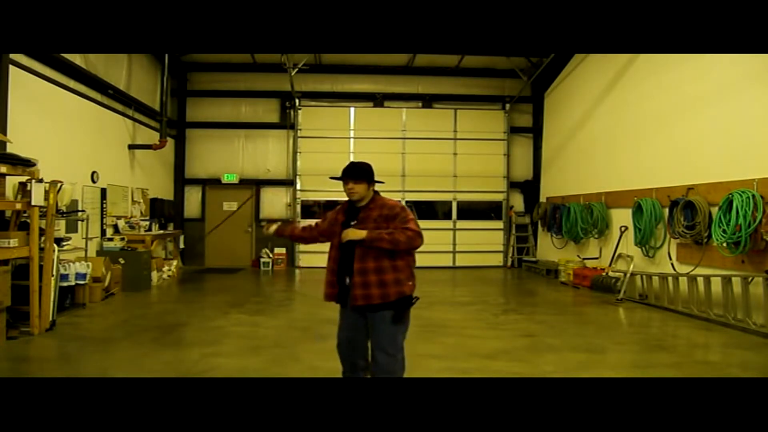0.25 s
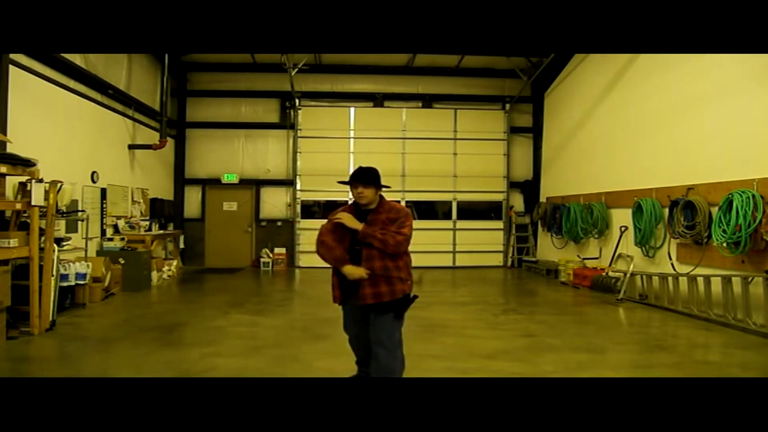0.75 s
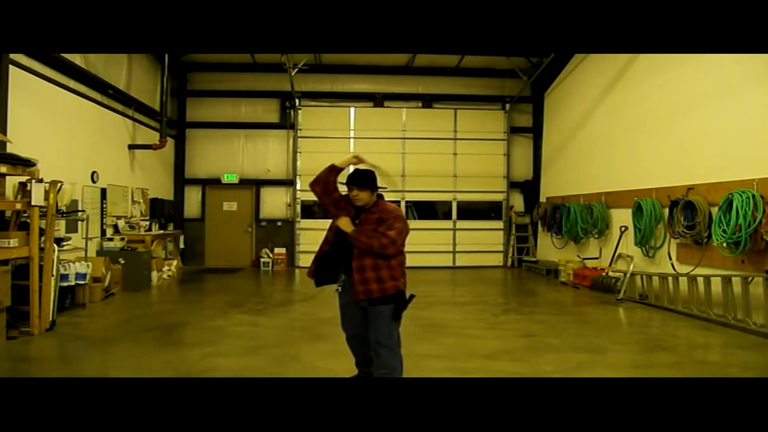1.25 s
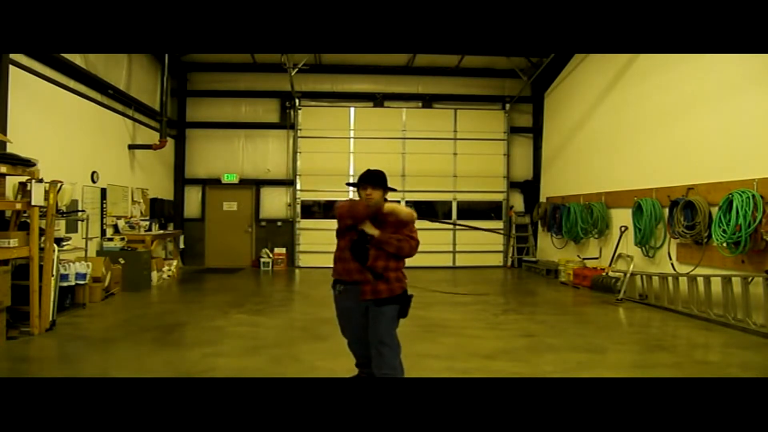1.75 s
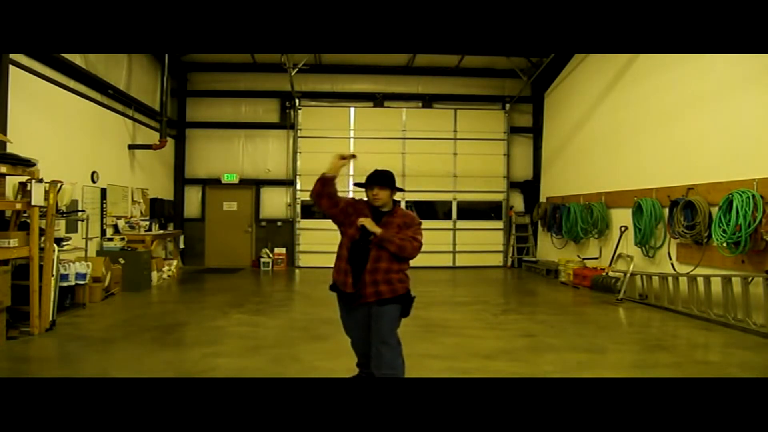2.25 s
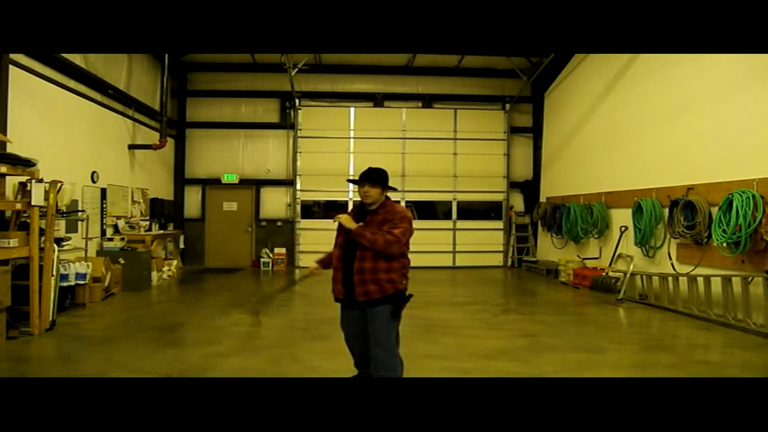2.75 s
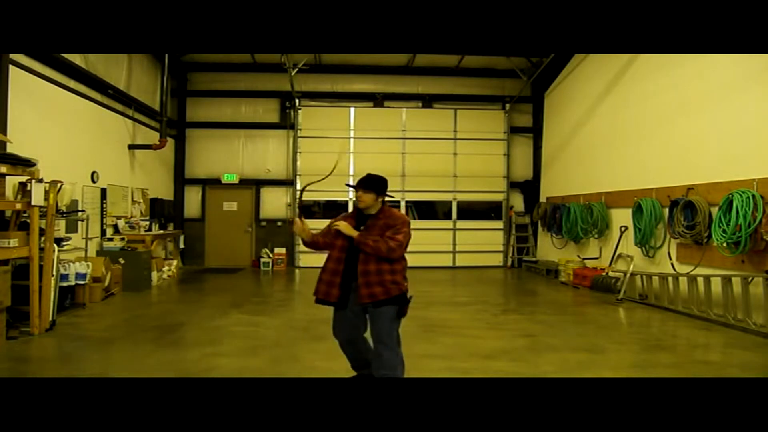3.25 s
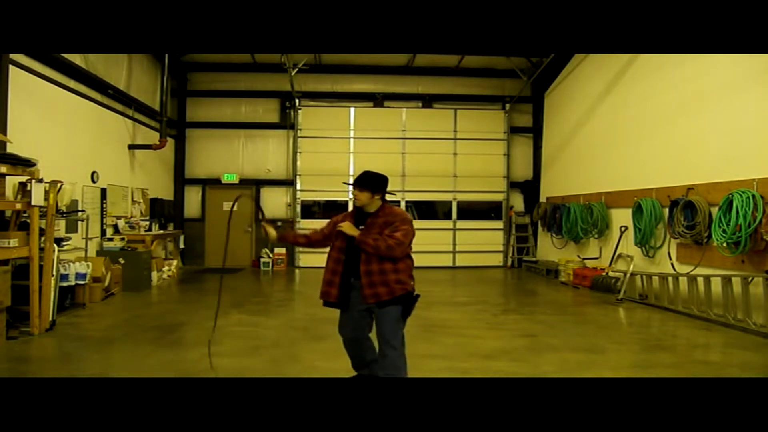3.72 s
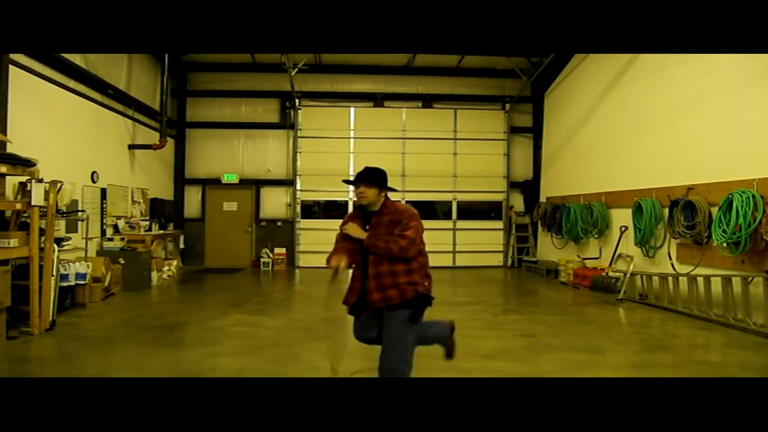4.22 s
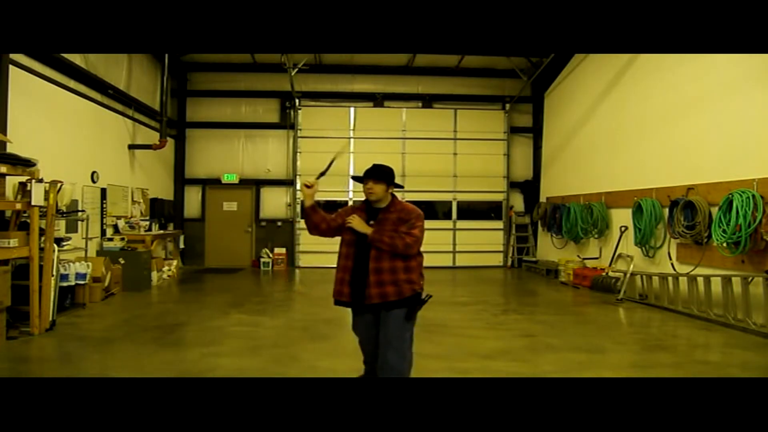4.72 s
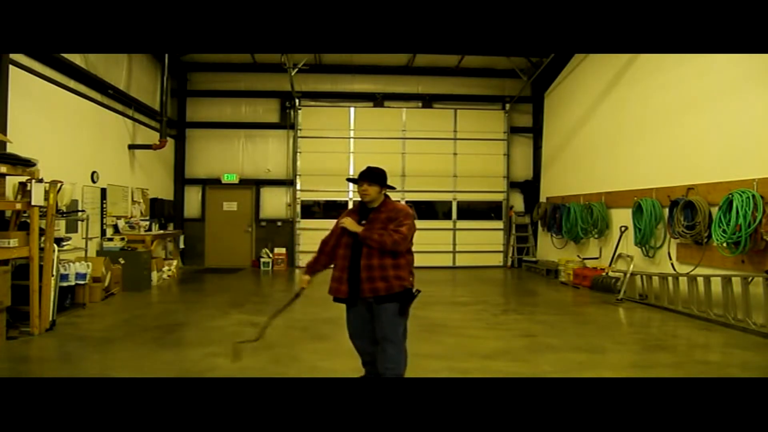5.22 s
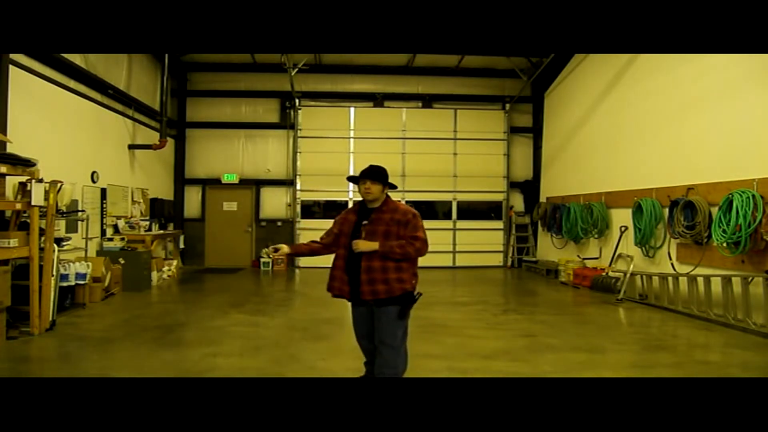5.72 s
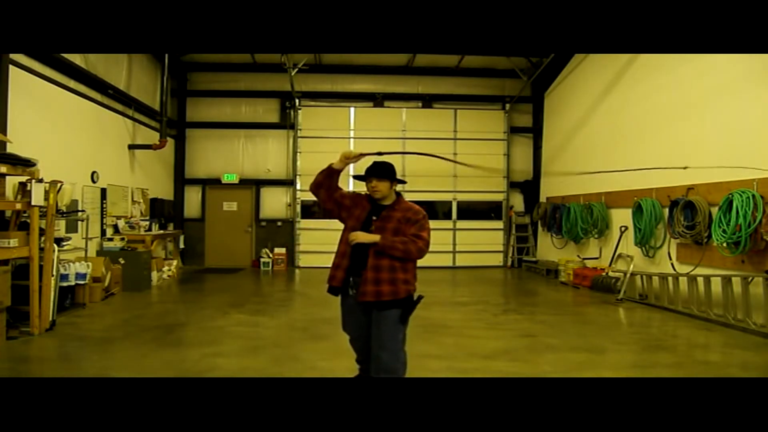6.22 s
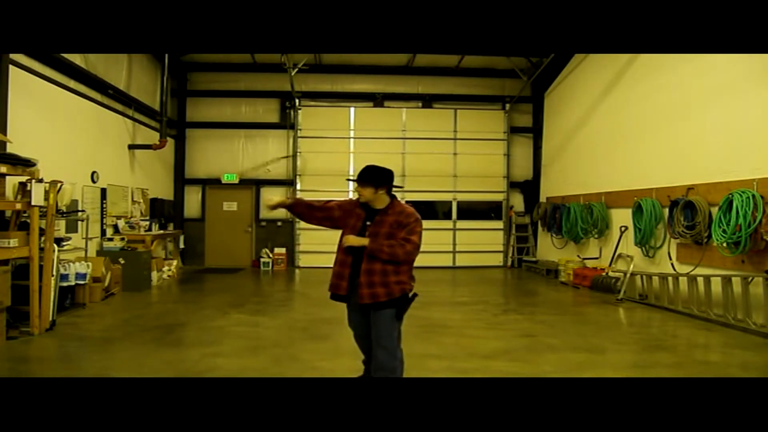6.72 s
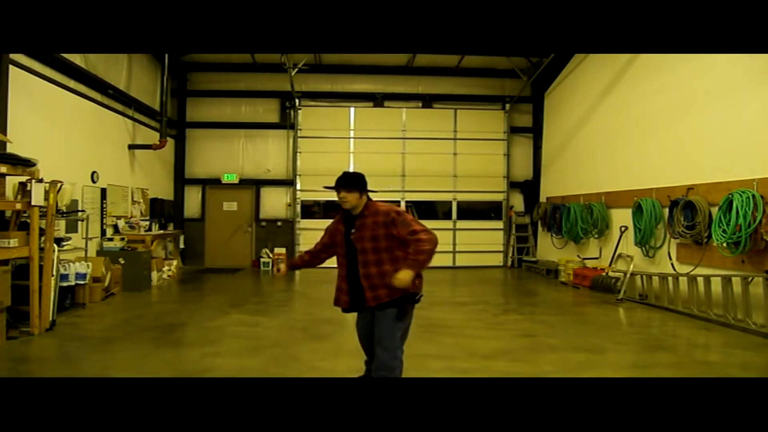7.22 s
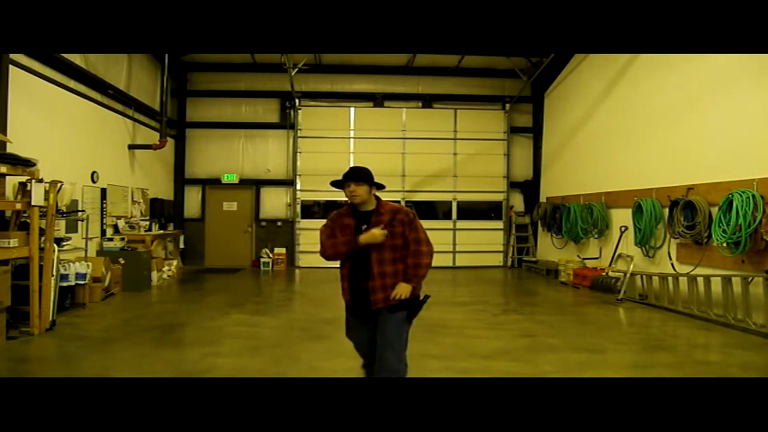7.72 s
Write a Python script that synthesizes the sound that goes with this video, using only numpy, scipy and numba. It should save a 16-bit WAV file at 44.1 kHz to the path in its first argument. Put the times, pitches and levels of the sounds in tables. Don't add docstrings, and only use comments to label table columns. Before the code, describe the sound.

In a big bare hall with a quiet hum, the tail of an earlier whip crack dies away. At 0.2 s a sharp crack bursts out with a dense echo, then a bright snap at 0.57 and a hard flick at 0.9. Soft swishes and small pitched flicks follow, with a faint crack at 1.8 and a flick at 2.0. A rising whistle leads to the hardest crack at 2.75, a dull one at 3.2, then a very hard, bright crack at 3.7 and strong ones at 4.13 and 4.55. A two-swell swish precedes the long-ringing crack at 5.36. A double flick snaps at 6.23; a falling whoosh leads to a crack and harder rebound at 7.05. A lone snap at 7.47 and a lower last crack at 7.87 with a bright rebound finish. Peaks clip; the microphone's gain ducks, then sustains the half-second echoes.

```python
import sys
import numpy as np
from scipy import signal
from scipy.fft import rfft, irfft
from scipy.io import wavfile
from numba import njit

SR = 44100
rng = np.random.default_rng(int(sys.argv[2]) if len(sys.argv) > 2 else 0)


def transcribe(u):
    v = np.clip(np.atleast_2d(u).T, -1, 1)
    q = np.round(v * 32767).astype(np.int16)
    wavfile.write(sys.argv[1], SR, q)


def gain_from_decibels(decibels):
    exponent = np.asarray(decibels, float) / 20
    return 10 ** exponent


N = 351191

SHARPNESS, THIN_SHARPNESS = 5.5, 4.5
CRACK_LIFT_DB = 6.5


def evened(x):
    return x / np.sqrt(np.mean(abs(x) ** 2) + 1e-20)


def read(points, hz):
    f, value = np.transpose(points)
    return np.interp(np.log(hz + 1), np.log(f + 1), value)


def add(mix, start_s, sound):
    part = mix[round(start_s * SR):][:len(sound)]
    part += sound[:len(part)]


def coloured_noise(size, points):
    spectrum = rfft(rng.standard_normal(size))
    gain_db = read(points, np.fft.rfftfreq(size, 1 / SR))
    return evened(irfft(spectrum * gain_from_decibels(gain_db), size))


def hum():
    # f/Hz, level/dB
    hum_spectrum = [(15, -70), (25, -66), (86, -30), (119, -38), (210, -5), (360, -3), (400, -1), (446, -6),
                    (539, -3.5), (829, -2.5), (1270, -8.5), (4280, -14.5), (15600, -20.5)]
    return gain_from_decibels(-46.5) * coloured_noise(N, hum_spectrum)


def hall():
    # f/Hz, t60/s
    hall_t60 = [(250, 0.48), (700, 0.48), (1600, 0.52), (3500, 0.65), (6500, 0.56), (10000, 0.41),
                (15000, 0.3)]
    size = 36864
    strong = rng.random(size) < 300 / SR
    taps = rng.standard_normal(size) * (1 + 2.5 * strong)
    hz, t, z = signal.stft(taps, SR, nperseg=256)
    t60_s = np.maximum(read(hall_t60, hz), .05)[:, None]
    tail = signal.istft(z * gain_from_decibels(-60 * t / t60_s), SR, nperseg=256)[1][:size]
    t = np.arange(size) / SR
    tail *= 1 - np.exp(-np.maximum(t - .004, 0) / 0.0016)
    return tail / np.sqrt(np.mean(tail[882:2205] ** 2))


def snap(shock_db, echo_db, tilt_db, band_hz, lift_db):
    # f/Hz, level/dB
    shock_spectrum = [(88, -59), (150, -23.5), (175, -22.5), (230, -12.5), (710, -2.5), (767, -3.5),
                      (1130, -1.5), (5570, -4), (8380, -6.5), (15600, -22)]
    path = hall()
    size = len(path)
    hz = np.fft.rfftfreq(size, 1 / SR)
    octaves = np.log2(hz / 2500 + 0.011)
    width_hz = (3500 + 1.04 * band_hz) / (abs(lift_db) - 4.5)
    band_db = lift_db * np.exp(-.5 * ((hz - band_hz) / width_hz) ** 2)
    base_db = read(shock_spectrum, hz) + tilt_db * octaves

    t = np.arange(-441, 882) / SR
    shape = np.where(t < 0, 0.097 * np.exp(t / 0.0026), np.exp(-(t / 0.0053) ** 2))
    burst = rng.standard_normal(len(t)) * shape
    direct_db = np.maximum(base_db, -20.) + 0.067 * octaves + 0.85 * band_db
    direct = gain_from_decibels(shock_db) * rfft(burst, size) * evened(gain_from_decibels(direct_db))
    echo = gain_from_decibels(echo_db) * rfft(np.roll(path, 441)) * evened(gain_from_decibels(base_db + band_db))
    return irfft(direct + echo, size)


def earlier_crack():
    # t/s, shock/dB, echo/dB, tilt/(dB/octave), favoured band f/Hz
    past_crack = (-0.19, 0.3, -15.5, 10.5, 6500)
    s, *row = past_crack
    return snap(*row, CRACK_LIFT_DB)[round(-s * SR):]


def whistle(hz, sharpness):
    r = np.exp(-np.pi * np.mean(hz) / sharpness / SR)
    noise = rng.standard_normal((len(hz) + 900, 2)) @ [1, 1j]
    slow = signal.lfilter([1], np.convolve([1, -r], [1, -r]), noise)[900:]
    carrier = np.exp(2j * np.pi * np.cumsum(hz) / SR)
    return evened((slow * carrier).real)


def lone_whistle(start_s, length_s, top_db, first_hz, last_hz, sharpness):
    u = np.linspace(0, 1, round(length_s * SR))
    swell = np.sin(np.pi / 2 * np.interp(u, [0, 0.32, 1], [0, 1, 0])) ** 2
    return start_s, gain_from_decibels(top_db) * swell * whistle(first_hz + (last_hz - first_hz) * u, sharpness)


def thong_whistles():
    # start t/s, length/s, top level/dB, first f/Hz, last f/Hz
    whistle_rows = [(0.047, 0.063, -49, 322, 310), (0.137, 0.036, -46, 1500, 1580),
                    (0.145, .03, -55, 360, 370), (1.184, .13, -44, 368, 310), (2.661, 0.03, -25, 908, 885),
                    (2.66, 0.062, -46, 345, 374), (3.311, 0.073, -33, 900, 876),
                    (3.641, 0.067, -33.5, 1650, 2170), (3.684, 0.024, -17.5, 1070, 1150),
                    (4.466, 0.04, -38, 720, 730), (5.639, .1, -45, 414, 400),
                    (5.841, 0.22, -40.5, 815, 802), (5.99, .11, -49, 349, 320),
                    (7.784, 0.086, -23, 1177, 1052), (0.561, 0.018, -16, 1682, 1690),
                    (6.877, 0.23, -48, 369, 328.3)]
    return [lone_whistle(*row, SHARPNESS) for row in whistle_rows]


def slaps():
    # t/s, shock/dB, echo/dB, favoured band f/Hz
    slap_rows = [(.082, -30.5, -46, 2520), (.170, -22, -34, 3500), (.183, -8, -10.5, 1800),
                 (.872, -18.5, -28.5, 1200), (3.687, -19, -42, 1100), (3.698, -9, -20, 1000),
                 (4.500, -22, -27, 790), (4.545, -7, -10.5, 600), (5.188, -29, -51, 900),
                 (5.643, -22, -40.5, 500), (5.871, -28, -29.5, 607), (4.765, -20, -33.5, 400),
                 (6.178, -32, -37.5, 1750), (6.799, -44, -43, 2000), (7.781, -24, -34, 1210)]
    tilt_db, lift_db = -2.5, 3
    return [(s, db, echo_db, tilt_db, hz, lift_db) for s, db, echo_db, hz in slap_rows]


def swing(level_db, hz, thin_db, hiss_db):
    # f/Hz, level/dB
    hiss_spectrum = [(300, -11.5), (1500, -1), (4000, -1.5), (9000, 0.5), (16000, -8)]
    thick = whistle(hz, SHARPNESS)
    thin = gain_from_decibels(thin_db) * whistle(2.1 * hz, THIN_SHARPNESS)
    hiss = gain_from_decibels(hiss_db) * coloured_noise(len(hz), hiss_spectrum)
    return gain_from_decibels(level_db) * (thick + thin + hiss) * signal.windows.tukey(len(hz), .08)


def rushes():
    # end t/s, length/s, last level/dB, last f/Hz, hiss re whistle/dB
    rush_rows = [(0.186, 0.064, -34, 850, 14.5), (0.912, 0.069, -21.5, 1255, 3),
                 (1.788, .13, -46.5, 940, 13.5), (2.739, 0.059, -21.5, 950, 6),
                 (3.702, .07, -28.5, 887, 12.5), (4.13, .04, -13, 1382, -2), (4.552, 0.054, -20.5, 1101, 4),
                 (5.36, 0.056, -27.5, 950, 7), (6.223, 0.049, -29, 1022, 13.5),
                 (7.047, .045, -27.5, 854, 11.5), (7.461, .02, -17.5, 1510, -3),
                 (7.863, 0.017, -10, 1299, -17)]
    rise_db, slow_share, thin_db = 26.5, .6, -0.5
    sounds = []
    for end_s, length_s, last_db, last_hz, hiss_db in rush_rows:
        speed = np.linspace(0, 1, round(length_s * SR)) ** 1.6
        hz = last_hz * (slow_share + (1 - slow_share) * speed)
        level_db = last_db - rise_db * (1 - speed)
        sounds.append((end_s - length_s, swing(level_db, hz, thin_db, hiss_db)))
    return sounds


def cracks():
    # t/s, shock/dB, echo/dB, tilt/(dB/octave), favoured band f/Hz
    crack_rows = [
        (.190, 1.5, 2, 1, 3160),
        (1.797, -16.5, -30, -1, 5030),
        (2.740, 23.5, 16, 3.5, 4500),
        (3.206, -5.5, -15.5, 1.5, 1030),
        (3.704, 22.5, 4.5, 2.5, 5400),
        (4.126, 7, -4, 1.5, 4360),
        (4.553, 11.5, -2.5, 3, 4570),
        (5.361, 6, 16.5, 4.5, 4470),
        (7.043, 3, 12, 2.5, 3940),
        (7.865, 2, -1, 0, 1490),
    ]
    return [(*row, CRACK_LIFT_DB) for row in crack_rows]


def kicks():
    # t/s, level/dB
    kick_rows = [
        (.190, -28),
        (.913, -35),
        (2.740, -27),
        (3.703, -19),
        (7.865, -32),
    ]
    out, t = np.zeros(N), np.arange(0, .03, 1 / SR)
    peak_s = .0012
    for s, db in kick_rows:
        add(out, s, gain_from_decibels(db) * t / peak_s * np.exp(1 - t / peak_s))
    return out


def flicks():
    # t/s, shock/dB, echo/dB, band f/Hz, lift/dB
    flick_rows = [(.896, -13, -19, 1280, 18), (0.899, -13, -42, 2690, 30), (1.341, -25, -37, 2247, 23),
                  (1.351, -25, -36, 970, 20), (1.591, -37, -54, 1970, 26), (1.997, -15.5, -21.5, 1130, 20),
                  (2.004, -39, -25, 1540, 31), (2.014, -11, -21.5, 3400, 17.5),
                  (2.584, -33.5, -42, 1590, 14), (5.855, -31, -39, 800, 9), (6.222, 3, -11.5, 4600, 15.5),
                  (7.788, -19, -38, 2747, 11), (.913, 3.5, -15, 1070, 8), (.567, -19, -9.5, 1370, 8),
                  (6.229, 3.5, -35, 5150, 27), (7.462, -6, -13, 1104, 9.5)]
    tilt_db = 0.3
    return [(s, db, echo_db, tilt_db, hz, lift_db) for s, db, echo_db, hz, lift_db in flick_rows]


def rebounds():
    # t/s, shock/dB, tilt/(dB/octave), favoured band f/Hz
    rebound_rows = [
        (0.571, -6.5, 14, 7200),
        (1.81, -17, 16, 7250),
        (4.136, 8, 1, 5500),
        (5.369, 1, 11, 3520),
        (6.234, 7, 0.5, 730),
        (7.055, 20, 0, 3040),
        (7.063, -1, -5, 1000),
        (7.477, -3.5, 1.5, 2540),
        (4.141, -7, 2, 5000),
        (7.879, 6.5, 4, 5850),
    ]
    echo_re_shock_db, lift_db = -21, 13.5
    return [(s, db, db + echo_re_shock_db, tilt_db, hz, lift_db) for s, db, tilt_db, hz in rebound_rows]


def ticks():
    # t/s, shock/dB
    tick_rows = [(1.12, -36), (1.76, -47), (1.97, -33.5), (5.685, -29), (5.775, -35), (5.872, -25.5),
                 (7.560, -27), (7.779, -23.5), (7.788, -26.5), (.913, -12), (.857, -34), (7.463, -16),
                 (0.86, -21), (4.503, -26.5), (5.35, -35), (5.2, -52), (1.36, -36), (6.222, -8),
                 (6.80, -38), (6.86, -55)]
    echo_re_shock_db, tilt_db, band_hz, lift_db = -6.5, 1, 11500, 7.5
    return [(s, db, db + echo_re_shock_db, tilt_db, band_hz, lift_db) for s, db in tick_rows]


def windups():
    # t/s, whistle/dB, whistle f/Hz
    windup_tables = [
        [(1.1, -50, 527), (1.2, -44.5, 551), (1.264, -41, 702), (1.298, -41.5, 730), (1.35, -32, 950),
         (1.45, -53, 820)],
        [(2.59, -53, 800), (2.61, -44, 739), (2.66, -32.5, 841), (2.705, -29.5, 862), (2.738, -31, 787)],
        [(4.97, -56, 408.6), (5.075, -51, 424.4), (5.1, -46, 597), (5.125, -46, 625), (5.142, -40.5, 808),
         (5.212, -35, 806), (5.286, -42.5, 666), (5.35, -29, 695)],
        [(6.80, -46, 1130), (6.848, -34, 1043), (6.898, -35, 858), (6.958, -36, 796), (7.018, -32, 712),
         (7.043, -32, 730)],
    ]
    thin_db, hiss_db = -12, -9.5
    sounds = []
    for rows in windup_tables:
        s, level_db, hz = np.transpose(rows)
        t = np.arange(s[0], s[-1], 1 / SR)
        sound = swing(np.interp(t, s, level_db), np.interp(t, s, hz), thin_db, hiss_db)
        sounds.append((s[0], sound))
    return sounds


def thin_whistles():
    # start t/s, length/s, top level/dB, first f/Hz, last f/Hz
    thin_rows = [
        (2.608, 0.1, -44, 1600, 1790),
        (2.683, .055, -32, 1900, 2110),
        (5.102, 0.14, -40, 1717, 1500),
        (6.79, 0.14, -46, 2150, 1995),
        (6.878, 0.093, -42.5, 1650, 1430),
        (6.964, 0.097, -36, 1340, 1550),
        (7.796, 0.082, -31, 2700, 2500),
    ]
    return [lone_whistle(*row, THIN_SHARPNESS) for row in thin_rows]


def scene():
    swings, shocks = np.zeros(N), np.zeros(N)
    for start_s, sound in thong_whistles() + rushes() + windups() + thin_whistles():
        add(swings, start_s, sound)
    path = hall()
    echo = signal.fftconvolve(swings, path / np.linalg.norm(path))[:N]
    swings = gain_from_decibels(2.5) * swings + gain_from_decibels(-5) * echo

    add(shocks, 0, earlier_crack())
    for s, *row in slaps() + cracks() + flicks() + rebounds() + ticks():
        add(shocks, s - .01, snap(*row))
    return (swings + shocks + hum())[None]


@njit
def follow(over_db, fall, rise_db):
    loss, now = np.zeros_like(over_db), 0.
    for i in range(len(over_db)):
        if over_db[i] > now:
            now = now + (over_db[i] - now) * fall
        else:
            now = max(now - rise_db, 0.)
        loss[i] = now
    return loss


def gain_control(x):
    smooth = 1 / (0.0062 * SR)
    power_db = 10 * np.log10(signal.lfilter([smooth], [1, smooth - 1], x ** 2) + 1e-12)
    loss_db = follow(np.maximum(power_db + 15.5, 0), 1 / (0.0016 * SR), 190. / SR)
    return x / gain_from_decibels(1.003 * loss_db)


def self_noise():
    # f/Hz, level/dB
    noise_spectrum = [(20, -14), (90, 6.5), (200, 1.5), (400, -19), (16000, -36)]
    return gain_from_decibels(-69) * coloured_noise(N, noise_spectrum)


def low_pass(x):
    return signal.sosfilt(signal.butter(12, 15750, fs=SR, output="sos"), x)


def record(dry):
    clipped = np.clip(gain_control(dry[0]), -1.05, 1.05)
    thinned = signal.lfilter(*signal.butter(2, 110., "high", fs=SR), clipped)
    noisy = thinned + kicks() + self_noise()
    notched = signal.lfilter(*signal.iirnotch(7870, 45, SR), noisy)
    edge = signal.firwin(511, 15760, window=("kaiser", 9), fs=SR)
    limited = signal.oaconvolve(notched, edge, "same")
    return low_pass(np.clip(limited, -1, 1)[None])


dry = scene()
out = record(dry)
transcribe(out)
```